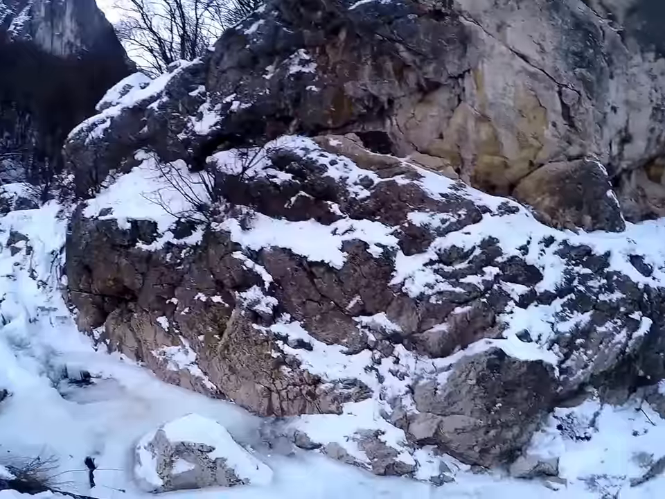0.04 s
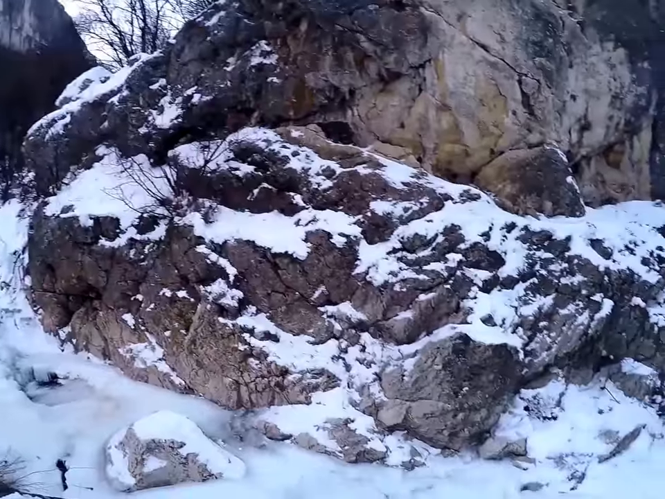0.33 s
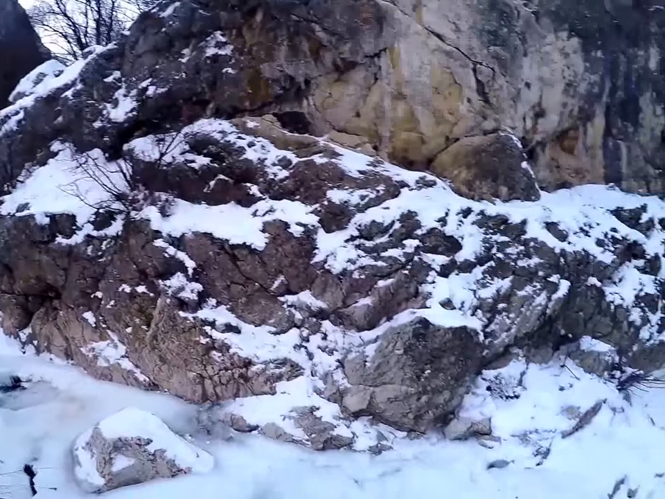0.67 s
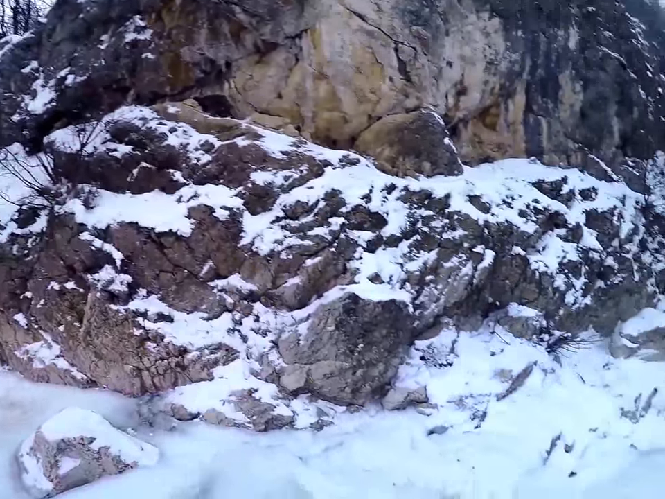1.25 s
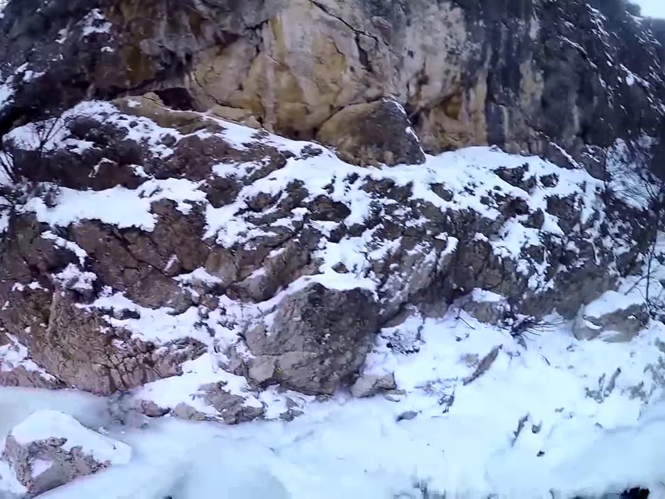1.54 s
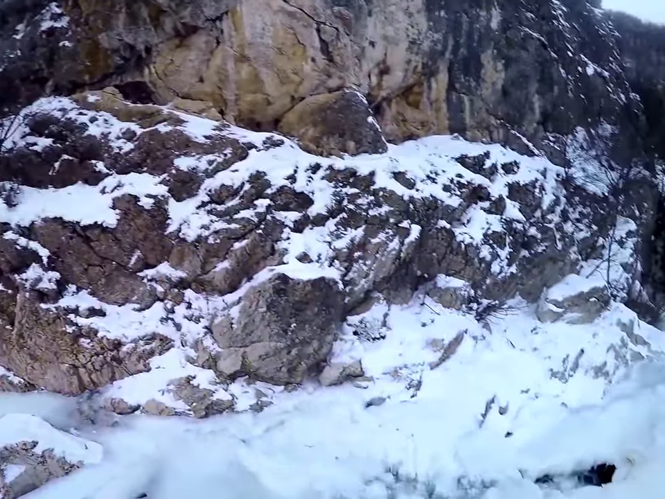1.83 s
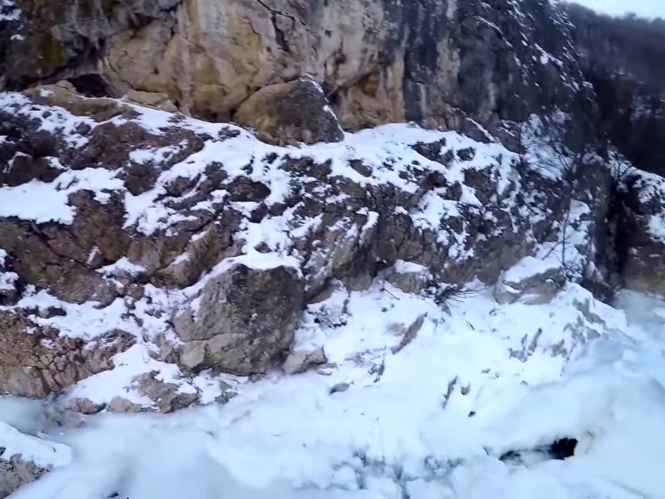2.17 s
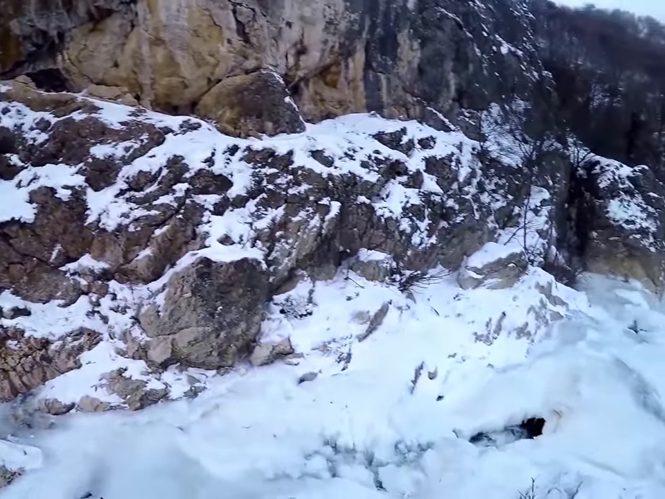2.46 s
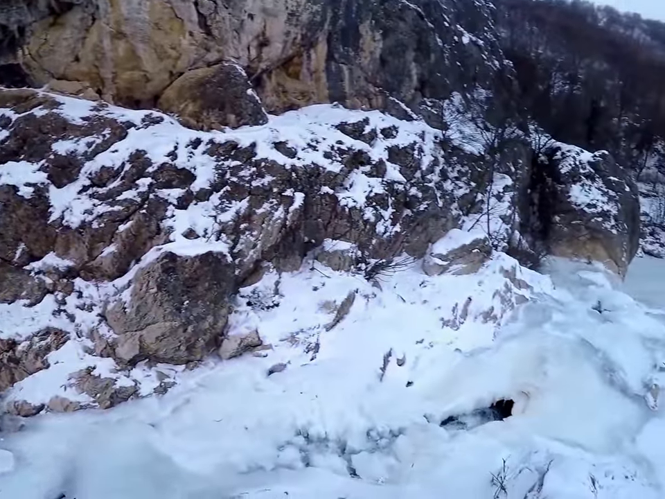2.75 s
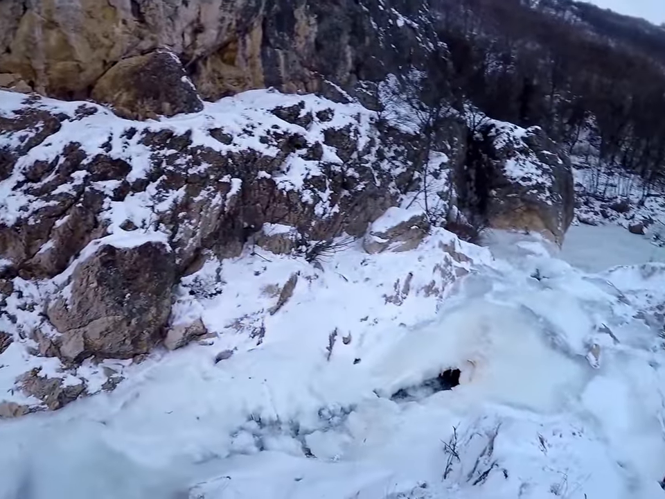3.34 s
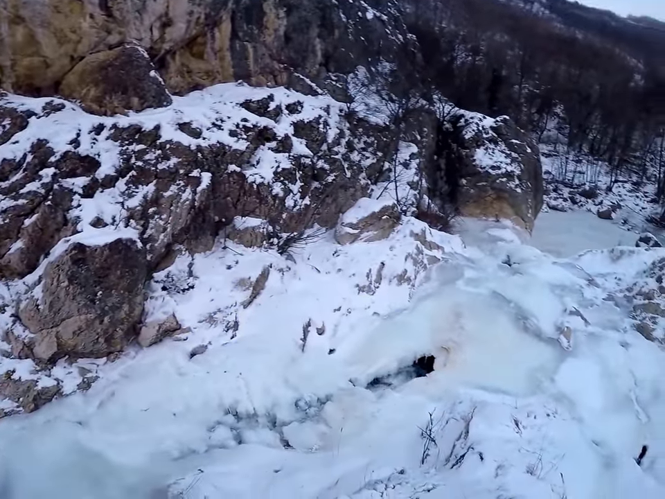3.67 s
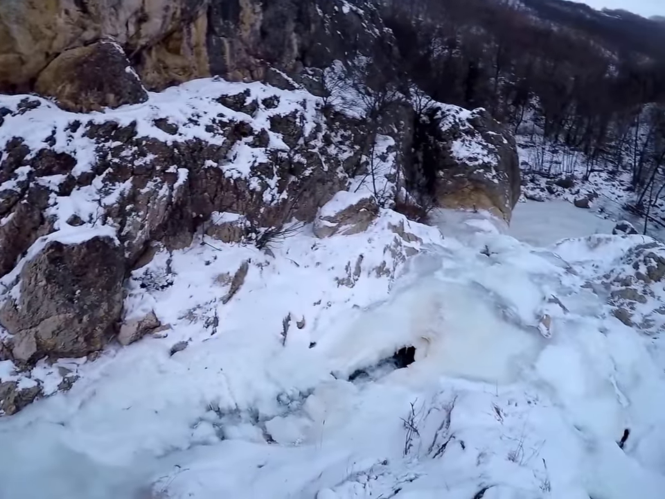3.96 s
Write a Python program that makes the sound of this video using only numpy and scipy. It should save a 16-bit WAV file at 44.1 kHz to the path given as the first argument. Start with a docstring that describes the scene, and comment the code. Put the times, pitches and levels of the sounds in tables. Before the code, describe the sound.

A few close snaps like cracking ice, with low electrical thumps and faint hiss underneath.

```python
"""Ticks by a frozen stream

Under a cliff, a few sharp, dry ticks sound very close to the microphone (ice, or the camera's case),
each a small slip and then a double snap into the same short resonances. Under them lie a faint hiss,
a soft rustle, two thin whines and a low pulsing, most likely radio interference: a steady beat of
about ten thumps a second with irregular ones between."""
import sys
import numpy as np
from scipy import signal
from scipy.io import wavfile
from scipy.ndimage import uniform_filter1d

SR = 44100
rng = np.random.default_rng(int(sys.argv[2]) if len(sys.argv) > 2 else 0)


def master(y):
    """Save y as 16-bit WAV."""
    cut = np.clip(np.atleast_2d(y).T, -1, 1)
    pcm = np.round(cut * 32767)  # scale
    wavfile.write(sys.argv[1], SR, pcm.astype(np.int16))


N = 176400

# close ticks: t/s, level/dB, snap gap/s, low cut/Hz, high cut/Hz, slip lead/s, slip level/dB
TICK_EVENTS = [(1.35, -25.5, 0.00059, 1200, 5530, .003, -17), (1.893, -21, 0.00051, 1200, 3950, .002, -16),
               (1.9491, -1, 0.00084, 302, 18000, 0.0047, -10),
               (2.1018, -2, 0.00085, 302, 9800, 0.0023, -15),
               (2.1752, -21.5, 0.00055, 900, 2170, 0.0019, -20),
               (2.325, -2.5, .00082, 300, 15000, 0.0021, -19),
               (2.4101, -19.5, 0.00043, 1300, 2280, .002, -17),
               (2.5563, -4, 0.00083, 300, 15000, .0036, -8), (2.8349, -18, 0.00064, 890, 1850, 0.0031, -20),
               (3.1253, 1, 0.00083, 300, 18000, .0028, -12),
               (3.7269, -6.5, 0.00057, 1320, 3440, 0.00125, -10),
               (3.7992, -12, .00048, 785, 6200, .002, -33)]
# resonances that every tick rings: f/Hz, level/dB, t60/s
TICK_MODES = [(805, -31.5, 0.017), (1437, -18.5, 0.0033), (2078, -16.5, 0.0079), (2575, -28.5, 0.018),
              (2658, -18.5, 0.0069), (3221, -31.5, 0.018), (3635, -20.5, 0.0032), (4336, -16.5, 0.0042),
              (5400, -28, 0.0096), (5760, -28.5, .01), (6560, -33, 0.0073), (7790, -43, 0.0069),
              (10000, -51.5, 0.0068), (10850, -30.5, 0.0015)]
# irregular interference thumps: t/s, level/dB
STRAY_THUMPS = [(0.4815, -1), (0.4868, -3), (0.541, -10), (0.5441, -6), (0.5472, -5), (0.5768, -19),
                (0.6567, -12), (0.6865, -2.5), (0.6959, -6), (0.7168, -23), (0.7364, -11), (0.9162, -13),
                (0.9367, -8), (0.9931, -2.5), (1.0215, -4), (1.037, -7), (1.1566, -6), (1.2162, -14),
                (1.2366, -8), (1.3883, -5), (1.3914, -1.5), (1.3949, -5), (1.4165, -4), (1.4942, -2),
                (1.5367, -12), (1.5696, -7.5), (1.6568, -7.5), (1.6889, -2.5), (1.8735, -4), (1.9179, -6),
                (1.9572, -5), (1.9966, -10), (2.0276, -1.5), (2.1364, -16.5), (2.3343, -13), (2.3776, -5),
                (2.3809, -3.5), (2.3837, -2), (2.3972, -11), (2.4568, -14), (2.5368, -5), (2.6569, -7),
                (2.6942, -0.5), (2.7568, -9), (2.7967, -7), (2.8754, -0.5), (2.917, -10), (2.9383, -7.5),
                (2.9561, -18), (2.9969, -9), (3.022, -14), (3.0246, -1), (3.0271, -3.5), (3.0767, -6.5),
                (3.1343, -8), (3.157, -4), (3.2568, -16), (3.3419, -8), (3.3765, -8), (3.39, -8),
                (3.3928, -5.5), (3.3955, -4.5), (3.4064, -17), (3.4968, -7.5), (3.5765, -10), (3.6564, -3),
                (3.6913, -2.5), (3.7576, -4.5), (3.8083, -3), (3.8758, -9.5), (3.9169, -7), (3.9571, 1.5)]
# spectral shape of the hiss: f/Hz, level/dB
HISS_SPECTRUM = [(20, 25), (60, 24), (150, 0.5), (400, 1), (800, -7), (1350, -8.5), (2100, -4.5),
                 (2500, -6.5), (2900, .3), (3500, -4.4), (4400, -9.5), (5300, -9.5), (6200, -11),
                 (7000, -10.5), (8000, -16), (13000, -18.5), (15200, -22.5)]
# swells of the rustle around 2 kHz: t/s, level/dB
MID_RUSTLE = [(.13, -69.5), (.85, -73), (1.05, -71), (1.2, -72), (1.35, -67.5), (1.6, -69.5), (1.9, -71.5),
              (2.4, -69.5), (2.7, -69), (3.1, -67.5), (3.4, -68), (3.5, -68.5), (3.6, -61.5), (3.7, -66.5),
              (4, -65.5)]
# swells of the rustle around 3 kHz: t/s, level/dB
HIGH_RUSTLE = [(.13, -64.5), (.5, -69), (1.2, -74), (4, -70)]
# electronic whines: f/Hz, rms level/dB, rms waver/Hz
WHINE_TONES = [(5033, -77, 7), (15080, -89, 5)]


def amp(db):
    return 10 ** (np.asarray(db) / 20)


def evened(x):
    return x / np.sqrt(np.mean(x ** 2) + 1e-20)


def add(mix, s, sound):
    part = mix[round(s * SR):][:len(sound)]
    part += sound[:len(part)]


def cut(x, hz, kind, order=2):
    """Butterworth filter."""
    return signal.sosfilt(signal.butter(order, np.clip(hz, 5, .49 * SR), kind, fs=SR, output="sos"), x)


def ring(t):
    """Short resonances, struck at t = 0 and dying away."""
    t = np.maximum(t, 0)
    return sum((-1) ** k * amp(db - 60 * t / t60) * np.sin(2 * np.pi * hz * t)
               for k, (hz, db, t60) in enumerate(TICK_MODES))


def ticks():
    """Right at the microphone: a dull slip, then two snaps under a millisecond apart; a low knock."""
    first_snap_db, knock_db, scatter_db = -7, -47.5, -29
    onset_s, t60_s = .01, .068
    t = np.arange(-onset_s, 4 * onset_s, 1 / SR)
    direct = np.zeros(N)
    for s, db, gap, low_hz, high_hz, lead, slip_db in TICK_EVENTS:
        slip = amp(slip_db) * cut(ring(t + lead), 2750, "low")
        snaps = amp(first_snap_db) * ring(t + gap) + ring(t)
        tick = cut(cut(slip + snaps, low_hz, "high"), high_hz, "low")
        add(direct, s - onset_s, amp(db + 1) * tick)
        knock = evened(cut(rng.standard_normal(len(t)), (169, 530), "band"))
        add(direct, s, amp(db + knock_db - 60 * (t + onset_s) / t60_s) * knock)
    # faint scatter from the ground
    age = np.arange(SR // 4) / SR
    tail = rng.standard_normal(len(age)) * amp(-60 * age / t60_s)
    scatter = signal.fftconvolve(direct, tail / np.linalg.norm(tail))[:N]
    return direct + amp(scatter_db) * scatter


def interference():
    """Short flat pulses at the input, on and between a steady beat, heard as low, gritty thumps."""
    beat_s, slot_s, weak_share = .1024, .02, .57
    pulse_s, edge_s, pulse_db = .0018, .00093, -23.5
    grit_db, grit_t60_s = -53, .011
    beat = [(s, 0) for s in np.arange(.1718, N / SR, beat_s)]
    # weaker pulses fall at random on a faster grid
    slots = np.arange(.5164, N / SR, slot_s)
    filled = rng.random(len(slots)) < weak_share
    weak_db = -10.5 + rng.standard_normal(len(slots))
    weak = list(zip(slots[filled], weak_db[filled]))
    t = np.arange(SR // 100) / SR
    pulse = np.clip(t / edge_s, 0, 1) - np.clip((t - pulse_s) / edge_s, 0, 1)
    pulses, grit_envelope = np.zeros((2, N))
    for s, db in beat + weak + list(STRAY_THUMPS):
        add(pulses, s, -amp(pulse_db + db) * pulse)
        add(grit_envelope, s, amp(grit_db + db / 2 - 60 * t / grit_t60_s))
    grit = evened(cut(rng.standard_normal(N), (418, 1255), "band"))
    return input_rolloff(pulses) + grit_envelope * grit


def input_rolloff(pulses):
    """A low-pass rounds each pulse; the input's bass roll-off makes it swing back."""
    rounding, swing = 2 * np.pi * 70.4, 2 * np.pi * 30.1  # corners, rad/s
    damping = .54
    poles = np.polymul([1, rounding], [1, swing * damping, swing ** 2])
    return signal.lfilter(*signal.bilinear([rounding, 0, 0], poles, SR), pulses)


def hiss():
    """A steady noise floor with faint patches drifting through its spectrum."""
    frames, hz = N // 256 + 5, np.fft.rfftfreq(1024, 1 / SR)
    real, imag, patches = rng.standard_normal((3, frames, len(hz)))
    patches = uniform_filter1d(patches, size=12, axis=0)
    patch_db = 1.46 * evened(uniform_filter1d(patches, size=12, axis=1))
    shape_hz, shape_db = np.transpose(HISS_SPECTRUM)
    floor_db = np.interp(np.log(hz + 1), np.log(shape_hz), shape_db)
    spectrum = (real + 1j * imag) * amp(floor_db + patch_db)
    _, noise = signal.istft(spectrum.T, nperseg=1024, noverlap=768)
    return amp(-52) * evened(noise[:N])


def rustle(levels, band_hz):
    """A soft band of background noise that swells and fades."""
    envelope = amp(np.interp(np.arange(N) / SR, *np.transpose(levels)))
    return envelope * evened(cut(rng.standard_normal(N), band_hz, "band"))


def whines():
    """Thin electronic tones, wavering slightly in pitch."""
    out = np.zeros(N)
    for hz, db, waver_hz in WHINE_TONES:
        waver = evened(cut(rng.standard_normal(N), 25, "low"))
        phase = 2 * np.pi * np.cumsum(hz + waver_hz * waver) / SR
        out += amp(db) * evened(np.sin(phase))
    return out


def scene():
    """Close ticks over the low pulsing and a faint background, in mono."""
    mix = ticks() + interference() + hiss()
    mix += rustle(MID_RUSTLE, band_hz=(1754, 2500)) + rustle(HIGH_RUSTLE, band_hz=(2820, 3650))
    return (mix + whines())[None]


def record(dry):
    """The sound opens after a moment of silence; the highest treble is cut off."""
    open_s, top_hz = .126, 15350
    live = dry * (np.arange(N) / SR > open_s)
    lowpass = signal.firwin(511, top_hz, window=("kaiser", 9), fs=SR)
    return signal.oaconvolve(live, lowpass[None], "same")


dry = scene()
out = record(dry)
master(out)
```